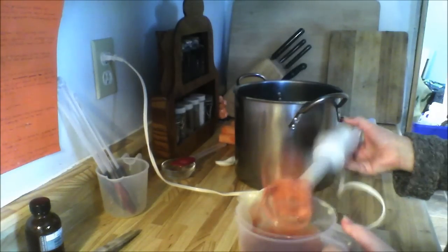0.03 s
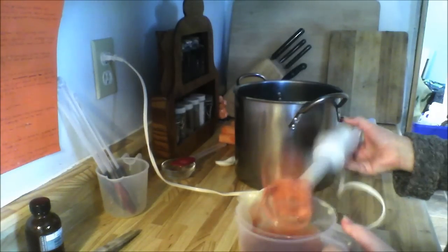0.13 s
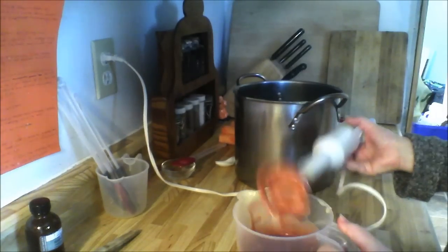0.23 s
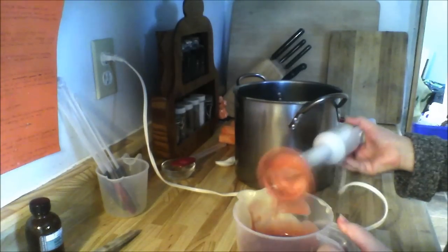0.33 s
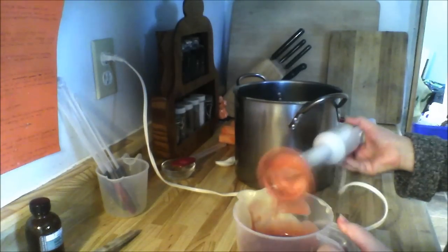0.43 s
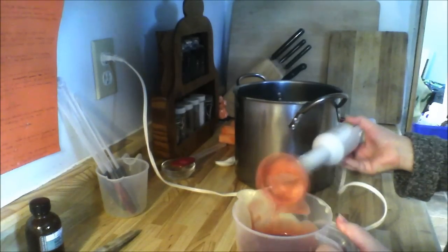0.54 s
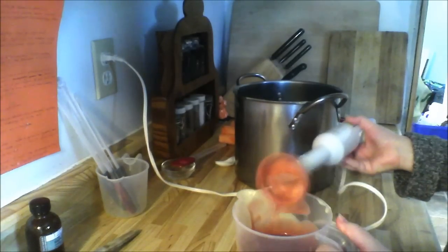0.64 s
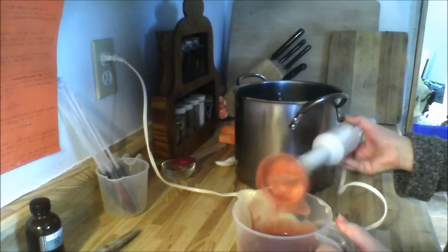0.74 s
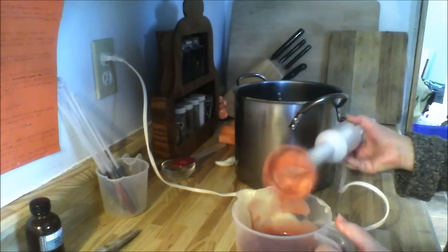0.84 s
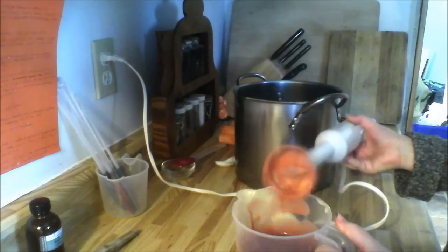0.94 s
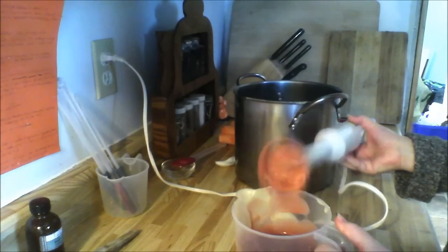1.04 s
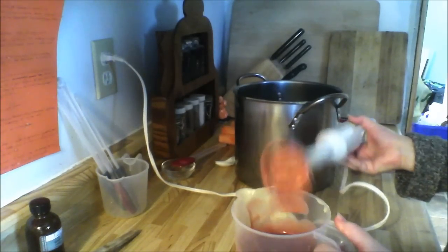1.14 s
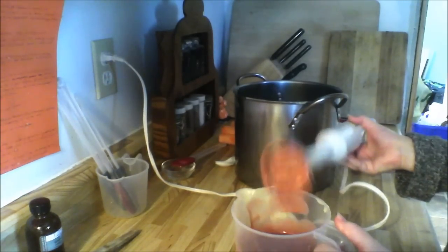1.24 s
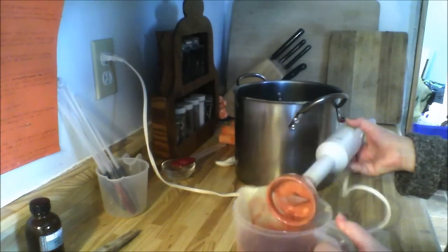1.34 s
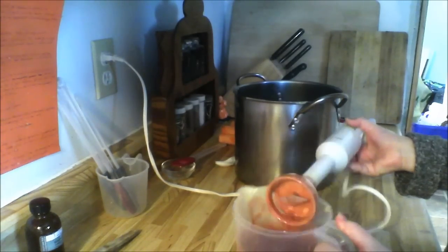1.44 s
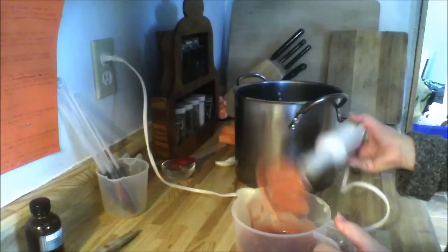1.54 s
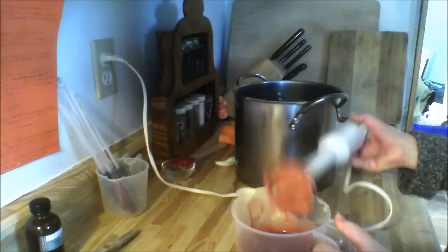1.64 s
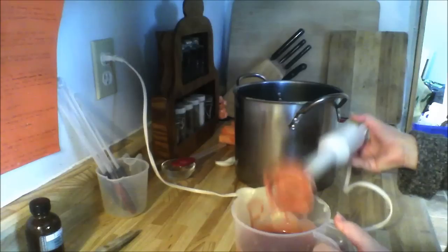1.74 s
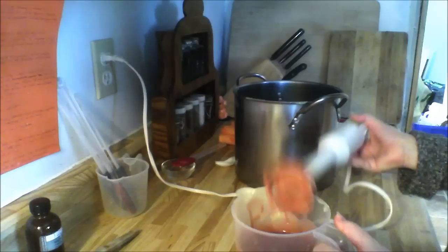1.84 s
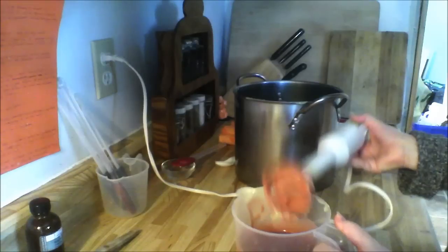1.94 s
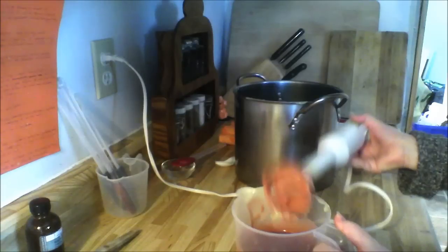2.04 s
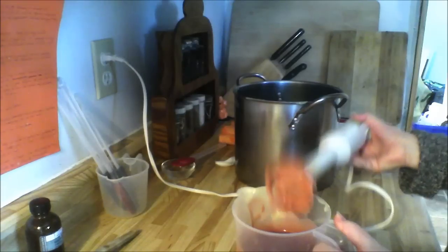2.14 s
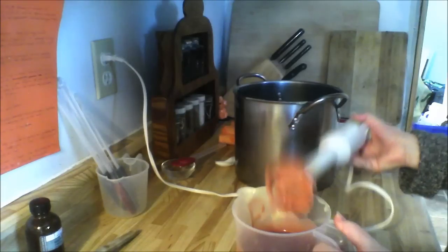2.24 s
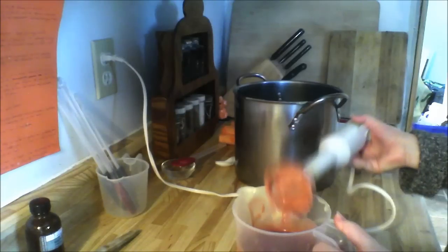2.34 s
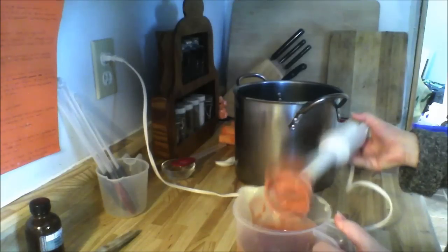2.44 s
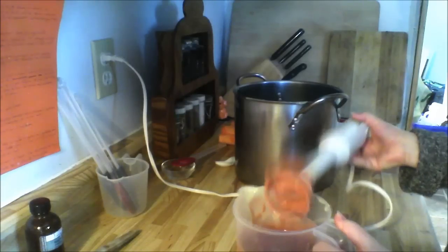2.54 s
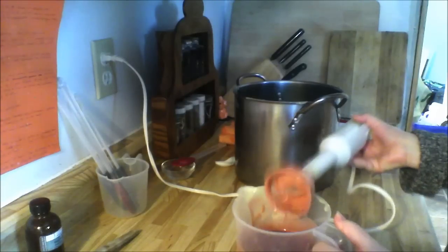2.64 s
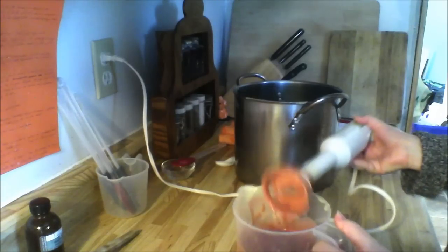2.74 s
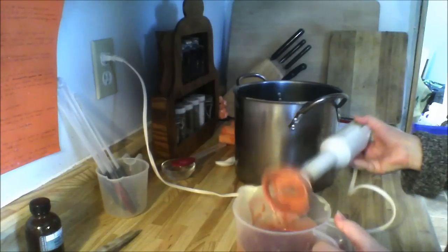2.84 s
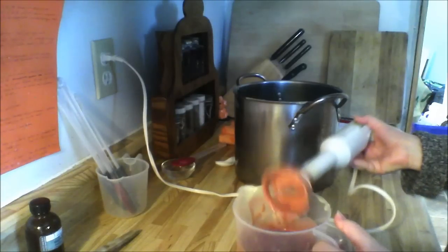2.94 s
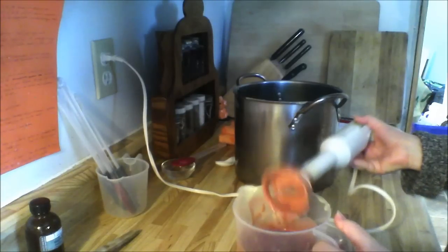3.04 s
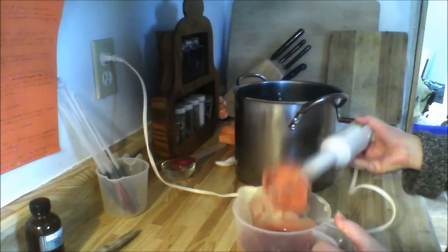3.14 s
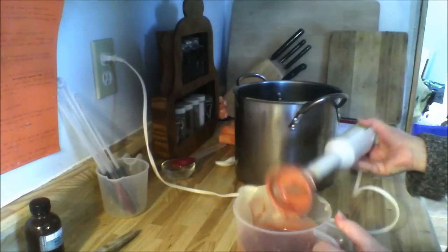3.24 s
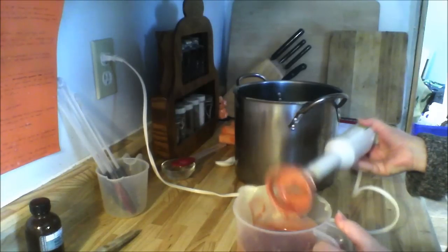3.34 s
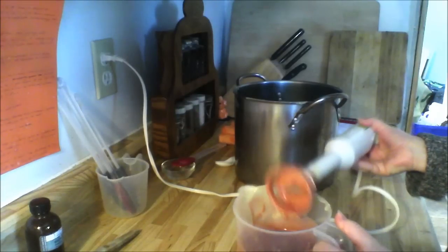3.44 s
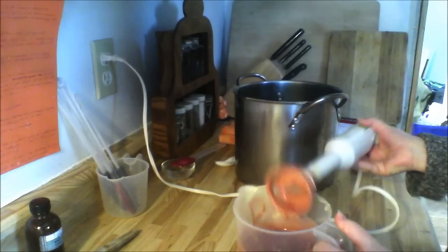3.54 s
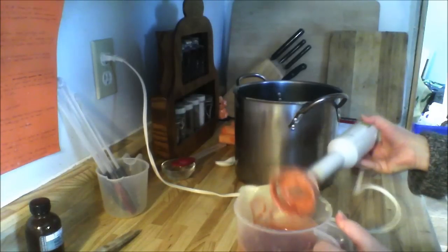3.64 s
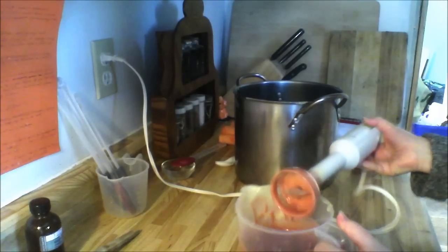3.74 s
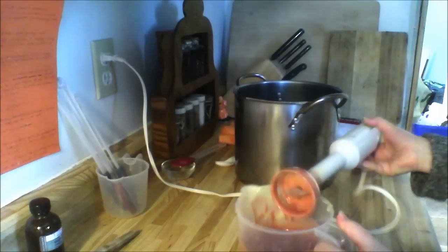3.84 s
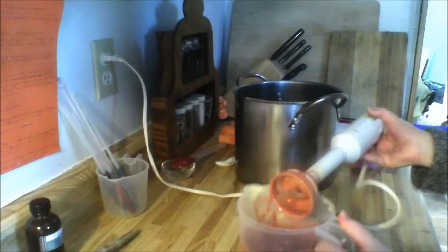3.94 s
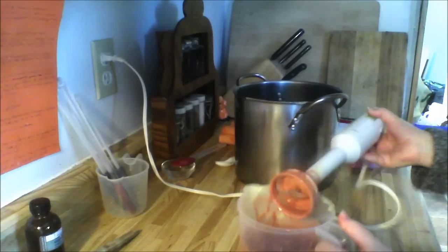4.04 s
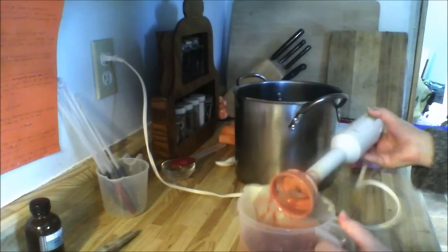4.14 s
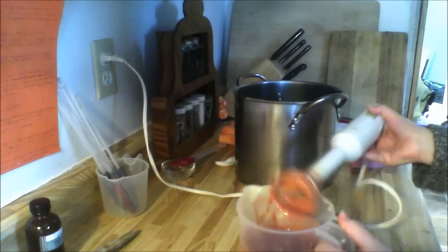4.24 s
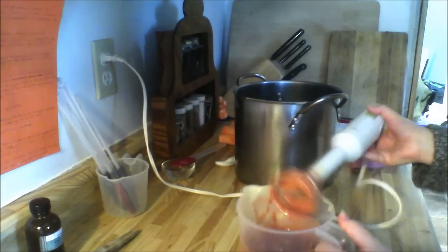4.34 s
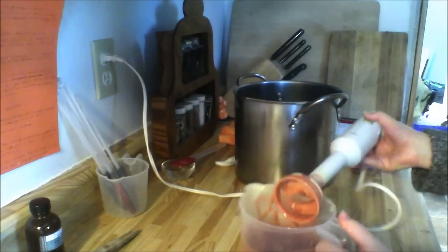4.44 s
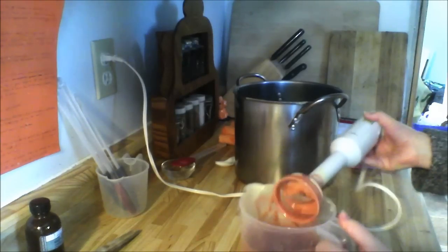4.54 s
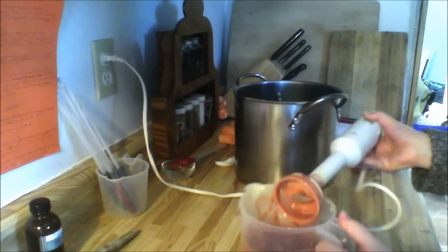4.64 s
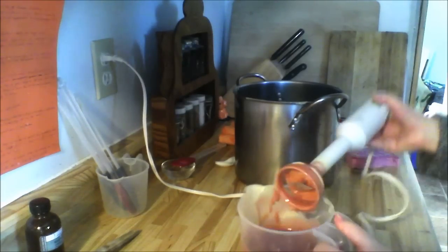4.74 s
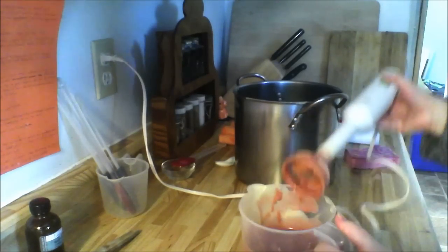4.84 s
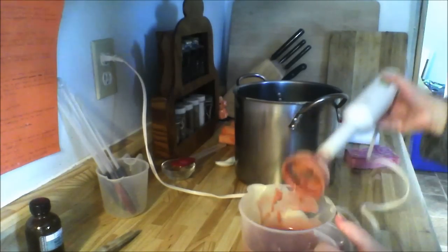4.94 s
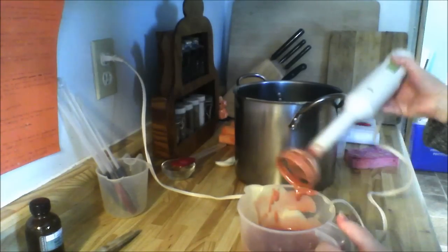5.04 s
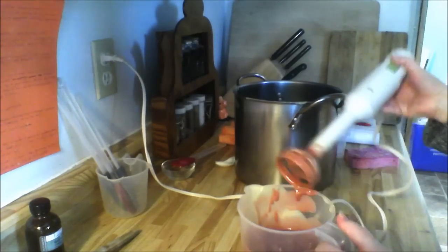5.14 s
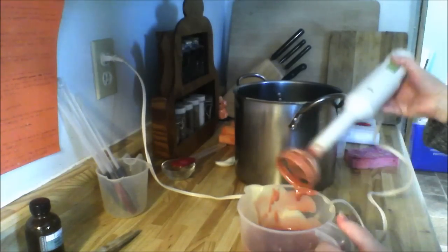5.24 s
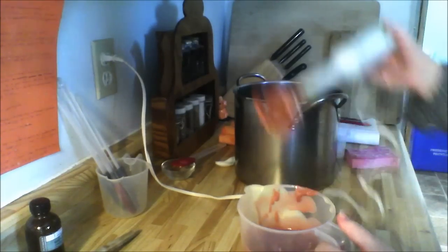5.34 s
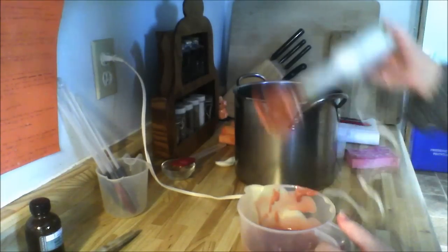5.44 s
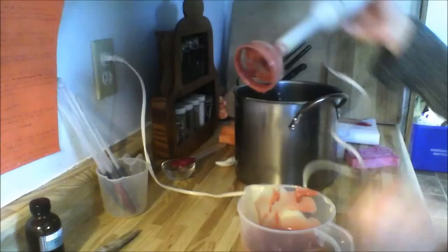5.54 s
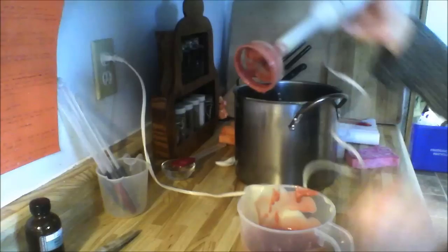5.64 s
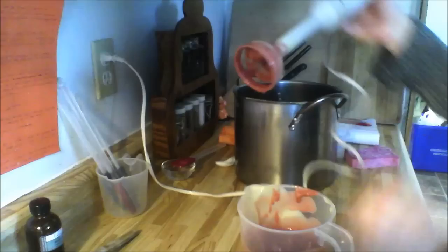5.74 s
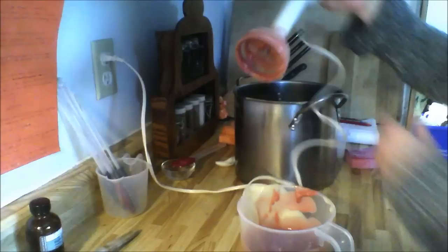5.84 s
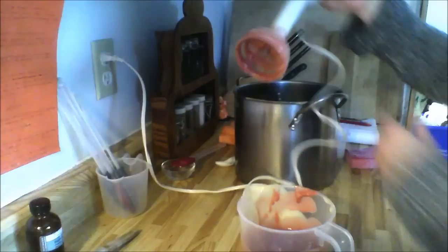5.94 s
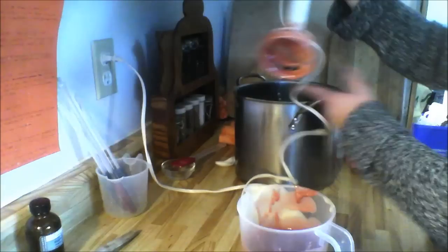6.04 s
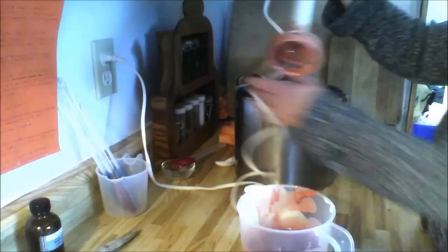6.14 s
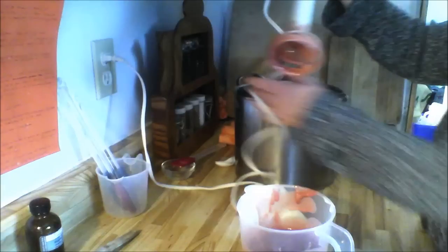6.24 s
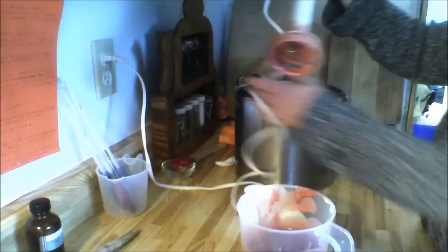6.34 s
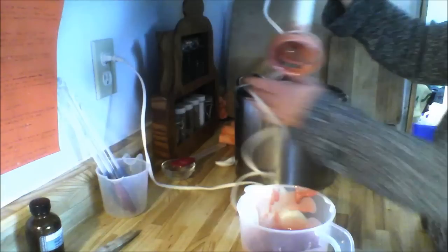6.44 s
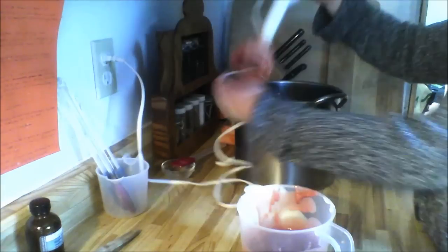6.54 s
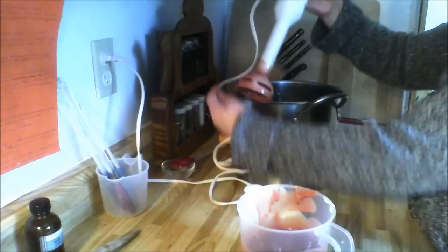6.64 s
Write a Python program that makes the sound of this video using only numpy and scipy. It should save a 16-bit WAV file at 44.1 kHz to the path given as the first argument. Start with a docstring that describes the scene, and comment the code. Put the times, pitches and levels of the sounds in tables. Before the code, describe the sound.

Close, loud and dry, a steady run of hollow plastic knocks fills the first four and a half seconds, each a double hit as the jolted pitcher drops back onto wood, with a short low boom strongest near the end. A nearby steel pot hums very faintly. Then near silence, with quiet clicks as the blender is lifted, barely audible sleeve rustle and a short rough drag of cord.

```python
"""The batter-laden head of a switched-off stick blender is knocked on a plastic pitcher's rim, four times a second.
Each impact excites damped modes and a dense noisy ring; the pitcher hops and lands back on a wooden counter.
A steel pot beside it sings on as faint decaying sines. Then the blender is lifted away: filtered noise bursts
make light taps, and shaped noise swells make a scrape, a plop of batter, a sleeve and the dragging cord.
The small room, heard close, answers with decaying noise in which the treble dies first."""
import sys
import numpy as np
from scipy import signal
from scipy.fft import rfft, irfft, next_fast_len
from scipy.io import wavfile
from scipy.ndimage import uniform_filter1d, map_coordinates

SR = 44100
rng = np.random.default_rng(int(sys.argv[2]) if len(sys.argv) > 2 else 0)


def file_out(sig):
    """Save sig as 16-bit WAV at sys.argv[1]."""
    # one column per channel
    cols = np.atleast_2d(sig).T
    # limit, then scale
    lim = np.clip(cols, -1, 1)
    pcm = np.round(lim * 32767).astype(np.int16)
    wavfile.write(sys.argv[1], SR, pcm)


N = 295690
TIME = np.arange(N) / SR  # seconds since the scene began
AGE = np.arange(SR // 2) / SR  # seconds since a contact


def amp(db):
    """Level: decibels to amplitude gain."""
    return 10 ** (np.asarray(db) / 20)


def unit(x):
    """Normalization: scale to rms 1."""
    return x / np.sqrt(np.mean(x ** 2) + 1e-20)


def along(points, hz):
    """Logarithmic pitch axis: interpolate (Hz, value) points at the given frequencies."""
    point_hz, values = np.transpose(points)
    return np.interp(np.log(hz + 1), np.log(point_hz + 1), values)


def fade(t60):
    """Exponential damping: the amplitude falls by 60 dB in t60 seconds."""
    return np.exp(-np.log(1000) * AGE / t60)


def rise(seconds):
    """Soft contact: the onset approaches full level with this time constant."""
    return 1 - np.exp(-AGE / seconds)


def noise(spectrum, size):
    """Spectral shaping: random noise of rms 1 with the given colour."""
    m = next_fast_len(size)
    gain = amp(along(spectrum, np.fft.rfftfreq(m, 1 / SR)))
    return unit(irfft(rfft(rng.standard_normal(m)) * gain, m)[:size])


def colour(x, points):
    """Minimum-phase filtering: a causal response through (Hz, dB) points."""
    m = 2 * next_fast_len(len(x))
    log_gain = np.log(amp(along(points, np.fft.rfftfreq(m, 1 / SR))))
    cepstrum = irfft(log_gain, m)
    # folding the cepstrum forward in time makes the filter causal
    cepstrum[1:m // 2] *= 2
    cepstrum[m // 2 + 1:] = 0
    return irfft(rfft(x, m) * np.exp(rfft(cepstrum)), m)[:len(x)]


def add(track, s, sound):
    """Superposition: mix a sound into the track from time s, cut at both ends of the scene."""
    start = round(s * SR)
    part = sound[max(-start, 0):max(N - start, 0)]
    track[max(start, 0):][:len(part)] += part


# Reverberation of the small room. Each row: frequency in Hz, t60 in seconds.
ROOM_DECAY = [(120, 0.39), (400, 0.3), (1000, 0.3), (2500, 0.25), (4200, 0.22), (6000, 0.15), (9000, 0.15)]


def room_tail():
    """Frequency-dependent absorption: decaying noise of energy 1 whose treble dies first."""
    hz, t, bands = signal.stft(rng.standard_normal(len(AGE)), SR, nperseg=256)
    decay = np.exp(-np.log(1000) * t / along(ROOM_DECAY, hz)[:, None])
    tail = signal.istft(bands * decay, SR, nperseg=256)[1][:len(AGE)]
    return tail / np.linalg.norm(tail)


def in_room(x, wet_db, delay=.009):
    """Reverberation by convolution: the direct sound, then the room's delayed answer."""
    tail = np.pad(room_tail(), (round(delay * SR), 0))
    return x + amp(wet_db) * signal.fftconvolve(x, tail)[:len(x)]


# Colour of a knock's many scattered reflections. Each row: frequency in Hz, level in dB per Hz.
DIFFUSE_TONE = [(50, -33.5), (95, -14), (125, -1), (185, 6), (280, -0.5), (380, 7.5), (550, -3.5),
                (850, 1.5), (1400, -5), (2000, -7.5), (3600, -12), (6300, -17.5), (8000, -44), (15000, -64)]


def wash():
    """Diffuse field: sound thrown off in all directions returns as a smooth, noisy tail."""
    return unit(colour(room_tail() * rise(0.019), DIFFUSE_TONE))


def worktop(x, near_db, t60, delay=.004):
    """Early reflection from pot, boards and wall; they shift as the pitcher is jolted about."""
    echoes = rng.standard_normal(len(AGE)) * fade(t60)
    echoes = np.pad(echoes / np.linalg.norm(echoes), (round(delay * SR), 0))
    return x + amp(near_db) * signal.fftconvolve(x, echoes)[:len(x)]


def ring(modes, scatter_db, detune=.005):
    """Modal superposition: damped sines of alternating sign that build up within a cycle."""
    out = np.zeros(len(AGE))
    for k, (hz, db, t60) in enumerate(modes):
        mode_hz = hz * (1 + detune * rng.normal())
        swing = np.sin(2 * np.pi * mode_hz * AGE) * rise(0.62 / hz)
        gain = amp(db + scatter_db * rng.normal())
        out += (-1) ** k * gain * fade(t60) * swing
    return out


# Modes of pitcher and blender shaft. Each row: frequency in Hz, level in dB, t60 in seconds.
PITCHER_MODES = [(128.55, -20, 0.16), (183.7, -5, 0.11), (232, -3, 0.025), (333.8, -20.5, 0.202),
                 (365.8, -8.5, 0.19), (421, -7, 0.04), (469, -15.5, 0.098), (563.4, -3.5, 0.025),
                 (638.5, -24, 0.2), (665.5, -20.5, 0.113), (769, -9.5, 0.058), (847, -17, 0.17),
                 (909, -21, 0.17), (1006, -19, 0.1), (1113, -15, 0.076), (1186, -18.5, 0.053),
                 (1287, -16, 0.036), (1637, -23.5, 0.116), (1790, -22.5, 0.097), (1800, -28.5, 0.055),
                 (1903, -29, 0.11), (2016, -19.5, 0.045), (2177, -27.5, 0.094), (2400, -18, 0.041),
                 (2630, -28.5, 0.092), (2860, -22, 0.03), (3345, -23.5, 0.089), (3452, -28.5, 0.13),
                 (3524, -14.5, 0.025)]


def pitcher_ring(scatter_db):
    """Modal excitation: a contact rings pitcher and shaft, with mode levels scattered at random."""
    return ring(PITCHER_MODES, scatter_db)


# Dense upper ring of the plastic. Each row: frequency in Hz, level in dB per Hz.
PLASTIC_TONE = [(600, -13.5), (1200, -0.5), (1450, -1.5), (1700, 5.5), (2400, 1), (3000, 3.5), (3600, -5),
                (4000, -0.5), (4700, -9), (5400, -7.5), (6500, -8.5), (7500, -21), (8600, -40),
                (15000, -66)]


def plastic_noise():
    """High modal density: upper modes too close to separate sound as coloured noise."""
    return noise(PLASTIC_TONE, len(AGE))


def clatter(t60, attack):
    """Damped high-density modes: a short burst of the plastic's upper ring."""
    return plastic_noise() * fade(t60) * rise(attack)


# Head on rim and the hop that follows. Each row: start in seconds, level in dB,
# counter thud in dB above -42 dB, hop in seconds, landing boom in dB.
BLOWS_AND_HOPS = [(-.075, -3.5, 12, .05, -12.5), (0.1812, 0.25, -6.5, .0474, -8),
                  (0.4279, -1.5, -11, .0488, -5.5), (0.664, -2.5, 13, .044, -10),
                  (0.9043, -3, 7, .0483, -7.5), (1.144, 0, -9, .0492, -9.5), (1.385, 0.9, 11, 0.054, -5),
                  (1.6252, -0.4, -3.5, 0.045, -6), (1.8643, -0.1, -3.5, .0512, -4.5),
                  (2.0891, -1.13, -7, .05, -7), (2.3361, -1.6, 19.5, .0452, -6),
                  (2.5645, -1.5, -7, .045, -10), (2.8032, -.8, -3, .05, -9.5), (3.032, -8, -18, .033, -12),
                  (3.261, -0.5, 4.5, .0485, 5), (3.5108, -1, -8, .0452, 5.5), (3.7429, 0, 9, .0475, 6.5),
                  (3.9767, 0, 6, .0563, -6), (4.2, -4.5, -19, .0403, -7.5), (4.4034, 0.5, -4, .0773, -.5)]
# Bass gain of the blows; it thins for a few of them. Each row: time in seconds, gain in dB.
BASS_OF_BLOWS = [(0, 2), (2.8, 0), (3.03, -5), (3.51, -5), (3.74, -1), (4.4, -0.4)]
MID_PER_BASS = -0.25  # dB of midrange for each dB of bass: a thin blow is also a harder one
CHATTER_S, CHATTER_DB = .017, -13.5  # the head rebounds and touches the rim once more


def blows():
    """Repeated impact: nearly the same spot is struck, so much of the clatter repeats; the head chatters once."""
    out, same_spot = np.zeros(N), plastic_noise()
    for s, db, thud_db, _, _ in BLOWS_AND_HOPS:
        bass_db = np.interp(s, *np.transpose(BASS_OF_BLOWS))
        mid_db = MID_PER_BASS * bass_db
        grain = unit(same_spot + 0.82 * plastic_noise())
        rattle = grain * (amp(-16) * fade(0.045) + amp(-20.5) * fade(0.066))
        # batter on the rim cushions the first instant
        body = (pitcher_ring(scatter_db=1.05) + rattle) * rise(0.0002)
        body = colour(body, [(45, -9.0), (115, bass_db), (250, bass_db), (370, bass_db / 2),
                             (550, mid_db + .5), (1200, mid_db + 0.88), (1800, -0.02)])
        body = worktop(body, near_db=-15.5, t60=0.082)
        knock = in_room(body, wet_db=-24.5) + amp(-35.5) * wash()
        add(out, s, amp(db) * knock)

        # the push goes through the pitcher into the heavy counter
        thud = noise([(12, -8), (30, 2.5), (70, -4.5), (130, -11), (400, -60)], len(AGE))
        add(out, s, amp(thud_db - 42) * thud * fade(0.095) * rise(.008))

        chatter = pitcher_ring(scatter_db=3.5) + amp(-10.5) * clatter(t60=0.026, attack=.0003)
        chatter = colour(chatter, [(300, -8), (700, 4), (2200, 1), (4000, -7)])
        chatter_s = s + CHATTER_S + .001 * rng.normal()
        add(out, chatter_s, amp(db + CHATTER_DB) * chatter * fade(.04))
    return out


def pot(hz, t60, db):
    """Lightly damped resonance: the steel stock pot beside the pitcher sings on faintly after each blow."""
    out = np.zeros(N)
    for s, blow_db, *_ in BLOWS_AND_HOPS:
        tone = np.sin(2 * np.pi * (hz + 2 * rng.normal()) * TIME)
        add(out, s, amp(db + blow_db - 60 * TIME / t60) * tone)
    return out


LAND_DB, LAND_GROWS = -9.5, 0.54  # pitcher level at a boom of 0 dB; dB more for each dB of boom
LAND_TREBLE_DB, LAND_BRIGHTENS = 2.9, .8  # after a blow of 0 dB; dB more for each dB of blow
EDGE_LEAD_S, EDGE_DB = .0018, -16  # one edge of the base ticks just before the rest lands
LONG_HOP_S, GRAZE_DB = .07, -13.5  # in a longer hop the base grazes the counter half-way
ROCK_S, ROCK_DB = 0.017, -12.5  # the base knocks again after landing
# Modes of the wooden counter. Each row: frequency in Hz, level in dB, t60 in seconds.
COUNTER_MODES = [(138, -16.5, 0.076), (183, -7, 0.1), (255, -9.5, .07)]


def landings():
    """Coupled impact: an edge ticks, then the weight lands, the counter booms and the pitcher rocks once."""
    out = np.zeros(N)
    for blow_s, blow_db, _, hop, boom_db in BLOWS_AND_HOPS:
        s, db = blow_s + hop, LAND_DB + LAND_GROWS * boom_db
        treble_db = LAND_TREBLE_DB + LAND_BRIGHTENS * blow_db
        add(out, s - EDGE_LEAD_S, amp(db + treble_db + EDGE_DB) * clatter(t60=.043, attack=0.00053))

        body = pitcher_ring(scatter_db=4) * rise(0.0012) * fade(.4)
        body += amp(-12.0) * clatter(t60=0.048, attack=0.00055)
        body = colour(body, [(50, -19.5), (130, -7.5), (340, -3.5), (800, -1.0), (1200, 0),
                             (1800, treble_db + .5), (4000, treble_db - 2.5)])
        boom = amp(boom_db) * colour(ring(COUNTER_MODES, scatter_db=1.76), [(50, -13.0), (110, -1)])
        add(out, s, in_room(amp(db) * body + boom, wet_db=-20.5) + amp(db - 35) * wash())
        add(out, s + ROCK_S, amp(ROCK_DB) * boom)
        if hop > LONG_HOP_S:
            add(out, blow_s + hop / 2, amp(db + GRAZE_DB) * clatter(t60=.06, attack=.001))
    return out


# Colour of the room tone. Each row: frequency in Hz, level in dB per Hz.
AIR_TONE = [(30, -46.5), (90, -27), (180, -10), (480, -11), (650, -18.5), (920, -14), (1300, -18.5),
            (1900, -19.5), (3700, -29.5), (6300, -37), (8000, -46), (16000, -52.5)]


def room_air(db):
    """Stationary noise: the quiet room's steady tone at one rms level."""
    return amp(db) * noise(AIR_TONE, N)


def slide(tone, start, db, attack, hold, release, slips_hz=300, rough_db=0):
    """Friction noise: a swell (times in seconds) whose level wanders by rough_db in small uneven slips."""
    swell = np.interp(TIME, start + np.cumsum([0, attack, hold, release]), [0, 1, 1, 0])
    knots = rng.standard_normal(int(N * slips_hz / SR) + 4)
    slips = map_coordinates(knots, [TIME * slips_hz], order=1)
    return swell * amp(db + rough_db * slips) * noise(tone, N)


# Colour of the head on the rim. Each row: frequency in Hz, level in dB per Hz.
HEAD_TONE = [(150, -20), (500, -2), (1000, -5), (1700, -16), (2030, 6), (2300, -6), (3600, -4), (4300, -12),
             (5000, -37), (9000, -51)]


def head_scrape():
    """Smooth friction: the head scrapes off the rim in one brief swell."""
    return slide(HEAD_TONE, start=4.888, db=-46, attack=.007, hold=.015, release=.055)


KNOCK_DB, KNOCK_REF_HZ, KNOCK_DB_PER_OCTAVE = 1.5, 400, -6.5  # low knocks stand out more from the tick
TAP_RING_HZ, TAP_RING_DB = 1690, -7.5  # the ring that all taps share
TAP_BASS_DB_PER_OCTAVE = -5  # a tap radiates little below its knock


def resonance(hz, q):
    """Resonant filtering: noise of rms 1 through two equal peaks, one loose resonance with steep skirts."""
    b, a = signal.iirpeak(hz, q, SR)
    once = signal.lfilter(b, a, rng.standard_normal(len(AGE)))
    return unit(signal.lfilter(b, a, once))


# Light handling taps of cord and blender. Each row: start in seconds, level in dB,
# knock frequency in Hz, treble gain of the tick in dB, t60 in seconds.
HANDLING_TAPS = [(4.889, -42, 185.4, -12, 0.15), (4.943, -53, 181, -11, .07),
                 (4.966, -53.5, 170, -18, 0.063), (5.005, -57.5, 200, -14, .055),
                 (5.163, -40, 397, 1.5, 0.12), (5.184, -43.5, 332, -6, 0.077),
                 (5.728, -32, 413, 6.5, 0.093), (5.745, -38.5, 392, -15, 0.083),
                 (5.763, -33.5, 470, 8, 0.096), (5.798, -44, 466, -23, 0.18), (6.204, -41, 895, -13, 0.066),
                 (6.319, -42.5, 960, -14, 0.16), (6.351, -43.5, 404, -6, 0.15),
                 (6.521, -40.5, 610, -3.5, .12), (6.552, -38.5, 800, -25, 0.079)]
# Colour of their tick. Each row: frequency in Hz, level in dB per Hz.
TICK_TONE = [(70, -37), (150, 5.5), (400, 4), (700, -7.5), (1050, 2.5), (1400, -4), (2100, -0.5),
             (3500, -8.5), (6000, -17), (7500, -43), (10000, -65)]


def taps():
    """Light impact: rattly contacts while the blender is lifted and its cord gathered."""
    out = np.zeros(N)
    for s, db, knock_hz, treble_db, t60 in HANDLING_TAPS:
        # the lowest point lies two octaves below the knock
        tick = colour(noise(TICK_TONE, len(AGE)), [(knock_hz / 4, 2 * TAP_BASS_DB_PER_OCTAVE),
                                                   (knock_hz, 0), (1800, 0), (4500, treble_db)])
        knock_db = KNOCK_DB + KNOCK_DB_PER_OCTAVE * np.log2(knock_hz / KNOCK_REF_HZ)
        knock = amp(knock_db) * resonance(knock_hz, q=3.9)
        shared_ring = amp(TAP_RING_DB) * resonance(TAP_RING_HZ, q=8.6)
        contact = (tick + knock + shared_ring) * fade(t60) * rise(0.0013)
        add(out, s, in_room(amp(db) * contact, wet_db=-22.5))
    return out


# Colour of falling batter. Each row: frequency in Hz, level in dB per Hz.
BATTER_TONE = [(50, -40), (90, -11), (175, 6), (300, -12.5), (470, -5), (650, -17), (900, -5), (1300, -30),
               (2200, -38), (5500, -43.5), (9000, -62)]


def batter_plop():
    """Soft impact: batter drops with a slow attack and a slightly uneven swell."""
    return slide(BATTER_TONE, start=5.372, db=-51.5, attack=.04, hold=.045, release=.018,
                 slips_hz=129, rough_db=0.5)


# Colour of the moving sleeve. Each row: frequency in Hz, level in dB per Hz.
FABRIC_TONE = [(80, -19), (250, -8), (480, 8), (700, -2.5), (1500, -1), (2500, -7), (5000, -23),
               (10000, -36)]


def sleeve():
    """Fabric friction: an arm moves for about a second in a very soft rustle."""
    return slide(FABRIC_TONE, start=5.48, db=-65.5, attack=.15, hold=.88, release=.1,
                 slips_hz=59.4, rough_db=1)


# Colour of the dragging cord. Each row: frequency in Hz, level in dB per Hz.
CORD_TONE = [(47, -55), (80, -45), (97, -13.5), (180, -7), (235, -12.5), (308, -0.5), (388, -12.5),
             (420, 1.5), (666, -19), (1100, -14.5), (3630, -28), (8000, -75), (10400, -100), (17600, -120)]


def cord_drag():
    """Rough friction: the cord drags in fast uneven slips and trails off."""
    return slide(CORD_TONE, start=6.357, db=-41.5, attack=.028, hold=.005, release=.125,
                 slips_hz=299, rough_db=3)


def scene():
    """Superposition: knocking, landings and pot, then the handling of the blender, over the quiet room."""
    knocking = blows() + pot(hz=890, t60=4.5, db=-66.5) + landings()
    handling = head_scrape() + taps() + batter_plop() + sleeve() + cord_drag()
    # the handling sounds carry no deep bass
    handling = colour(handling, [(40, -19.5), (85, -9.0), (150, 1), (7000, -1.0), (9000, -10.0)])
    return (knocking + handling + room_air(db=-66.0))[None]


def suppress(x, shut_db=-57, open_db=-48, depth_db=6):
    """Downward expansion: a noise suppressor turns quiet stretches down, so that tails end early."""
    power = np.abs(uniform_filter1d(x ** 2, size=700))  # averaged over 16 ms
    level_db = 10 * np.log10(power + 1e-12)
    return x * amp(np.interp(level_db, [shut_db, open_db], [-depth_db, 0]))


TOP_HZ = 16500  # band limit


def record(dry):
    """Expansion, clipping and band limiting: quiet is lowered, peaks clip at full scale, the top is cut."""
    m = next_fast_len(N + SR // 2)
    clipped = np.clip(suppress(dry), -1, 1)
    passband = np.fft.rfftfreq(m, 1 / SR) < TOP_HZ
    return irfft(rfft(clipped, m) * passband, m)[:, :N]


dry = scene()
out = record(dry)
file_out(out)
```